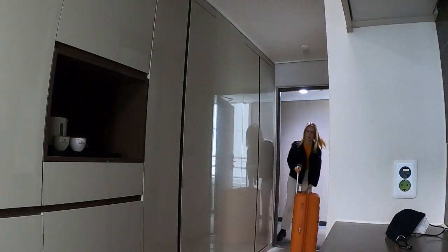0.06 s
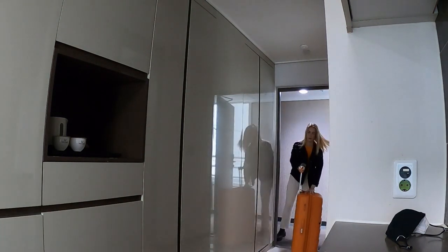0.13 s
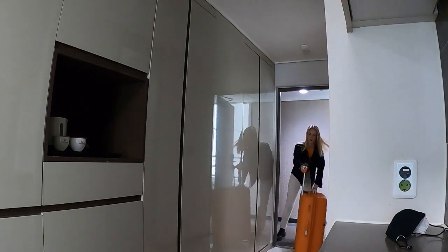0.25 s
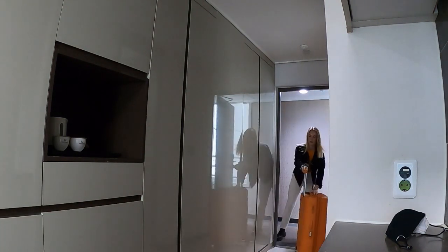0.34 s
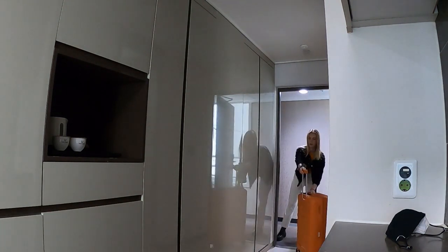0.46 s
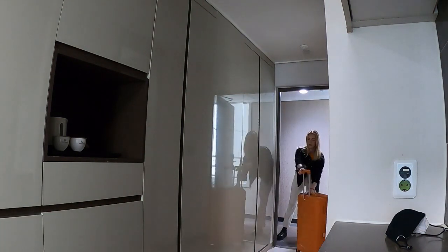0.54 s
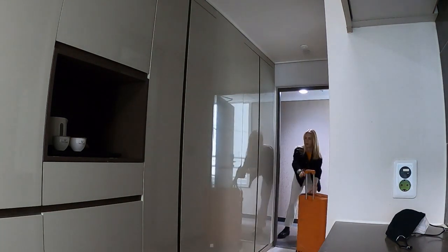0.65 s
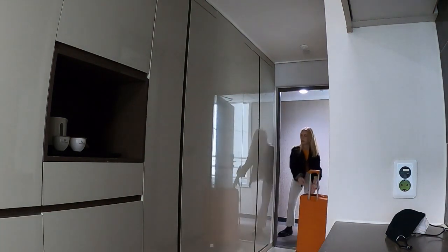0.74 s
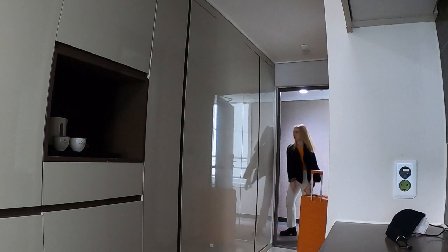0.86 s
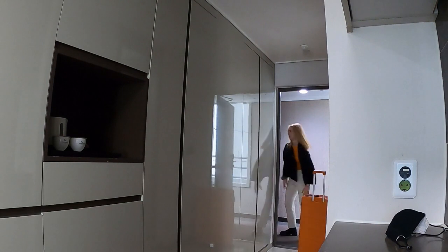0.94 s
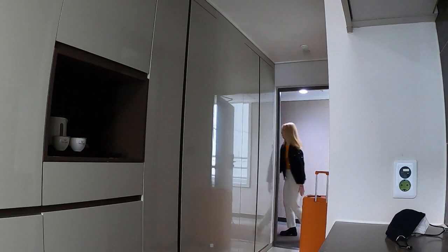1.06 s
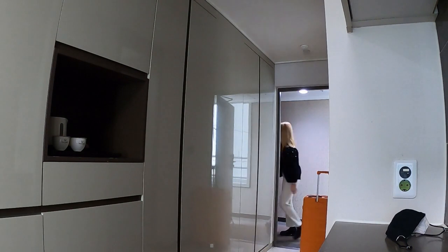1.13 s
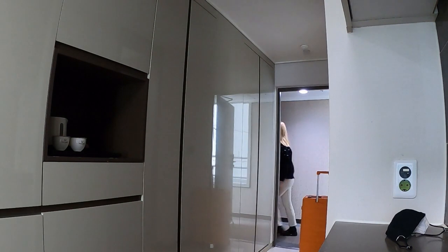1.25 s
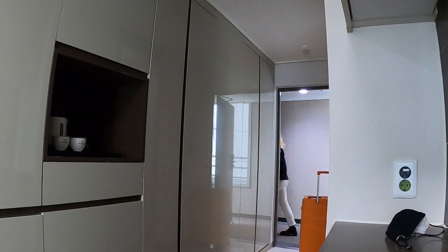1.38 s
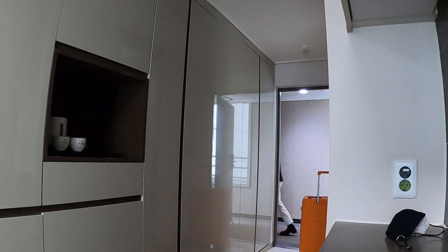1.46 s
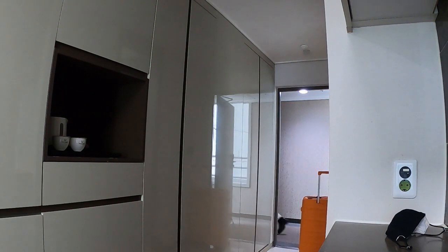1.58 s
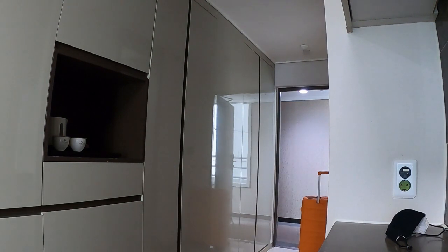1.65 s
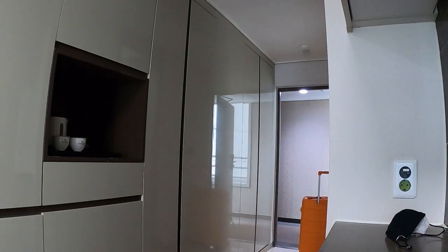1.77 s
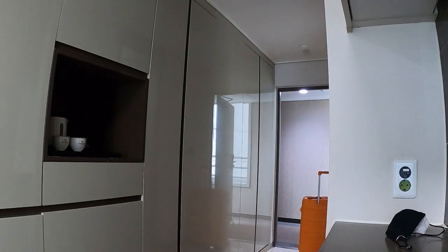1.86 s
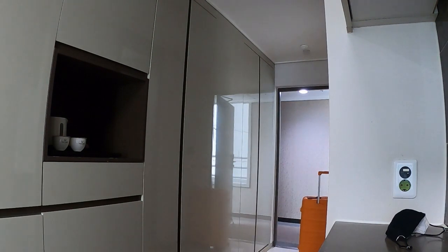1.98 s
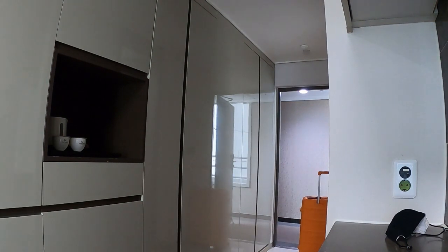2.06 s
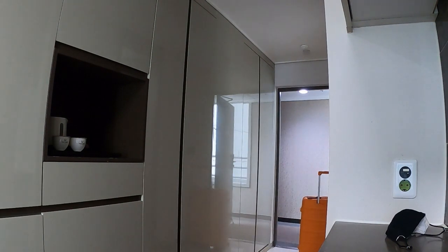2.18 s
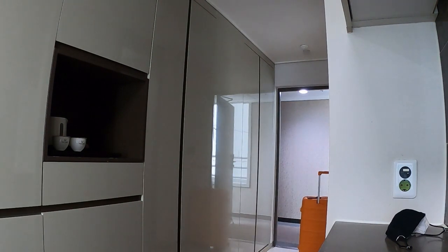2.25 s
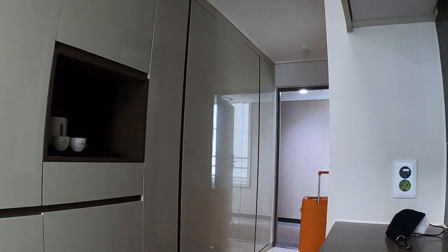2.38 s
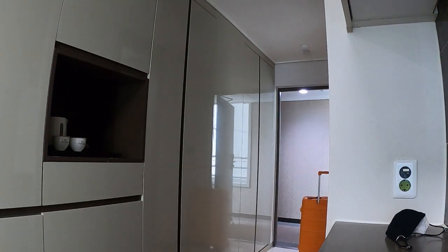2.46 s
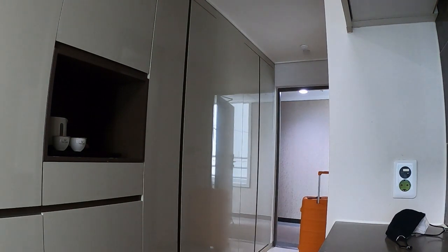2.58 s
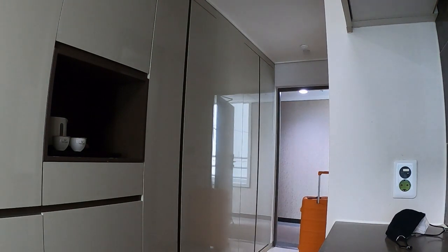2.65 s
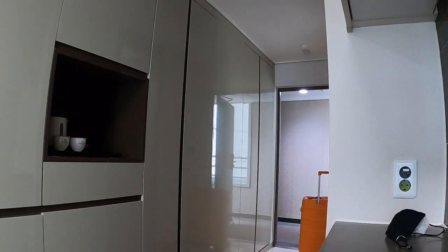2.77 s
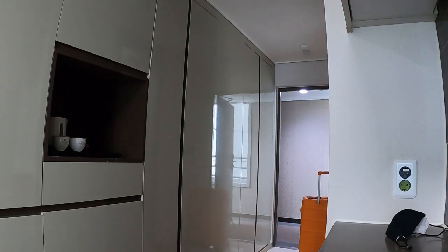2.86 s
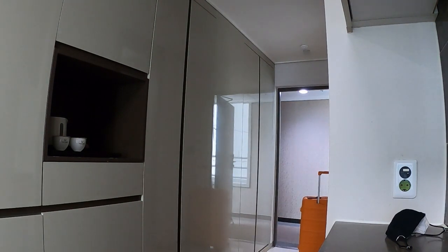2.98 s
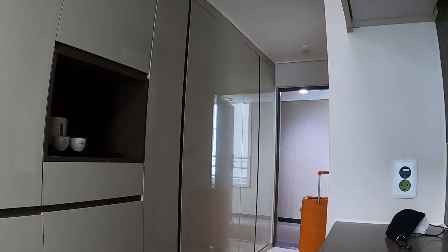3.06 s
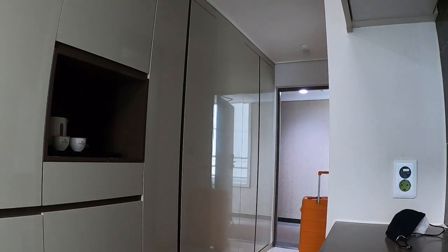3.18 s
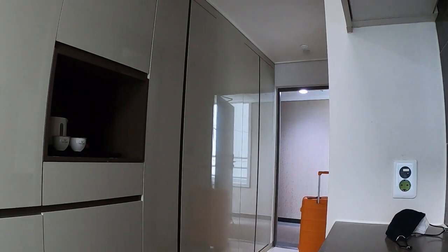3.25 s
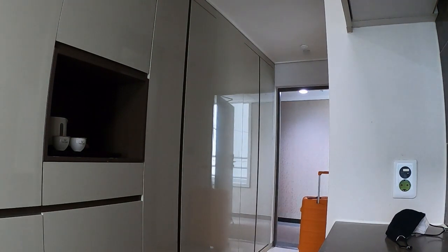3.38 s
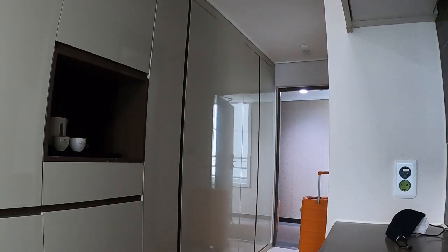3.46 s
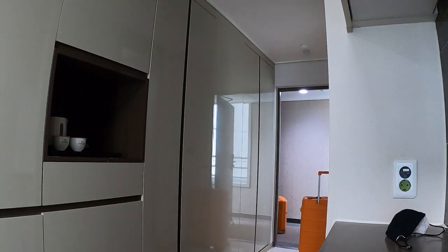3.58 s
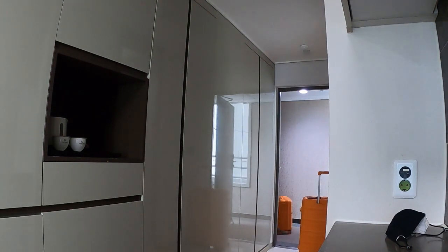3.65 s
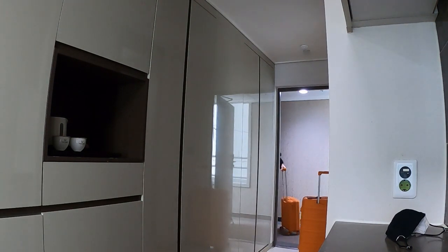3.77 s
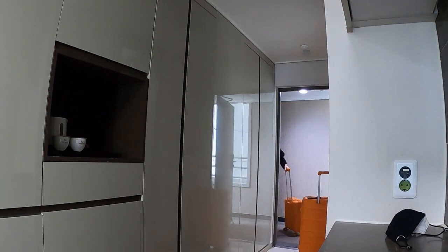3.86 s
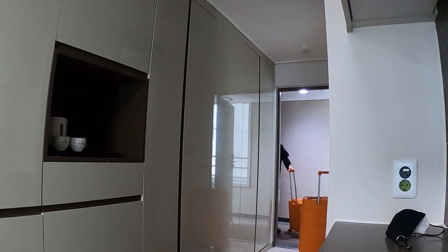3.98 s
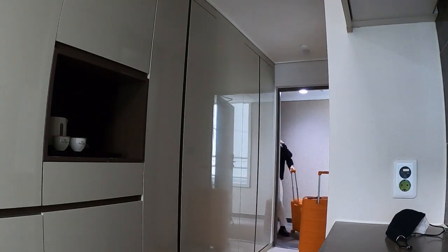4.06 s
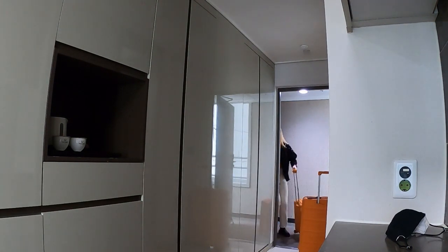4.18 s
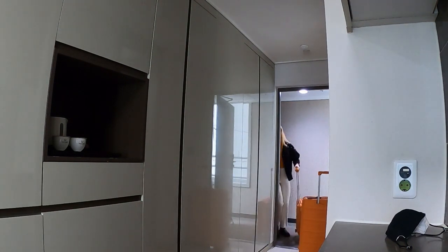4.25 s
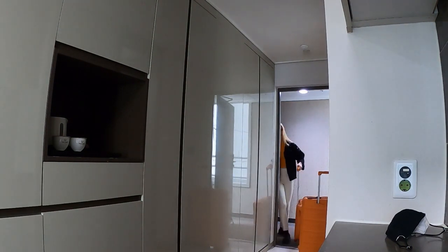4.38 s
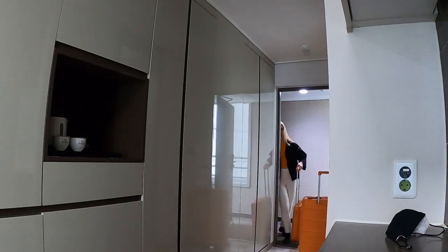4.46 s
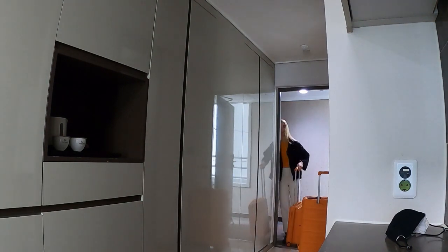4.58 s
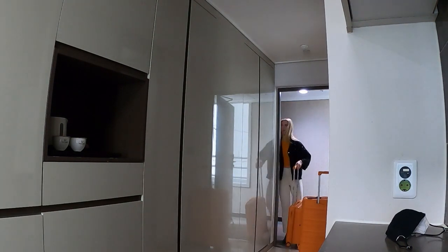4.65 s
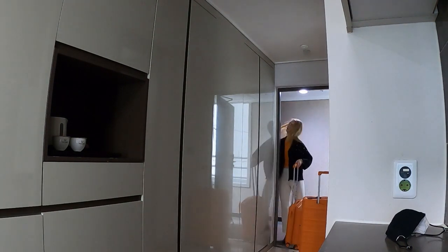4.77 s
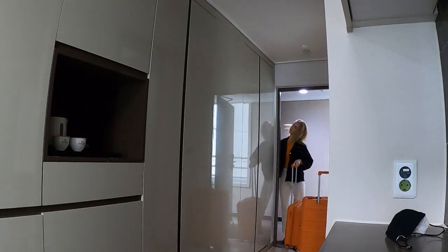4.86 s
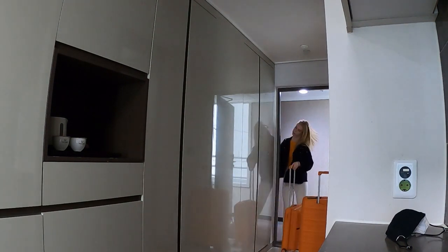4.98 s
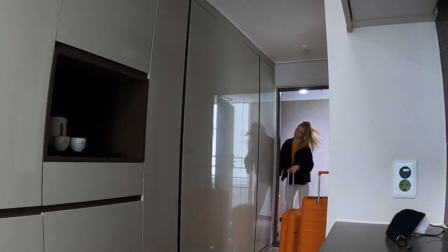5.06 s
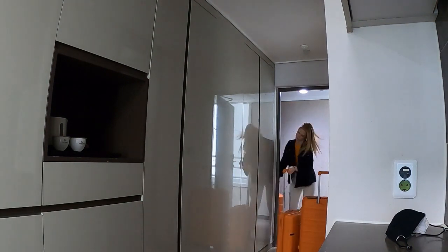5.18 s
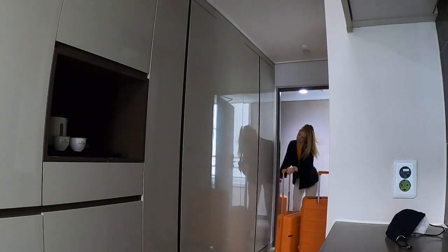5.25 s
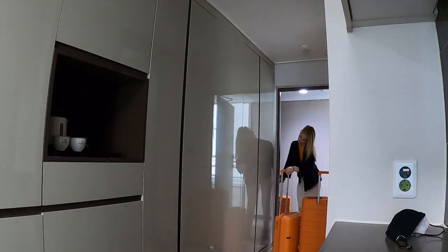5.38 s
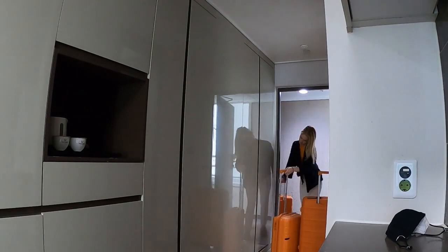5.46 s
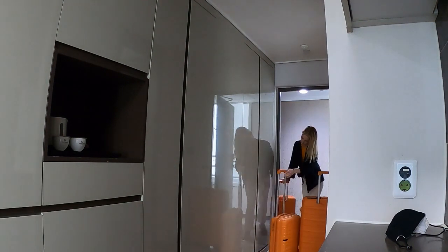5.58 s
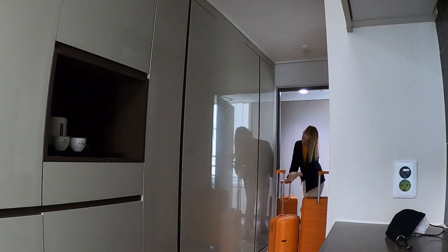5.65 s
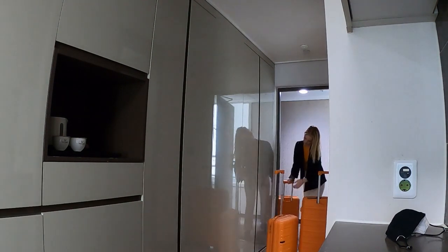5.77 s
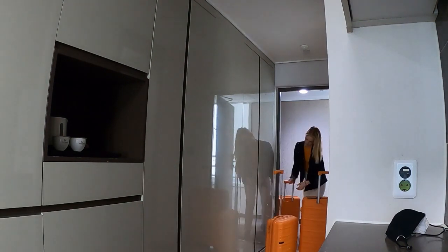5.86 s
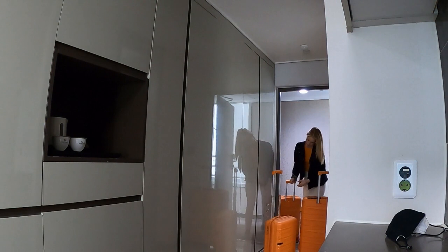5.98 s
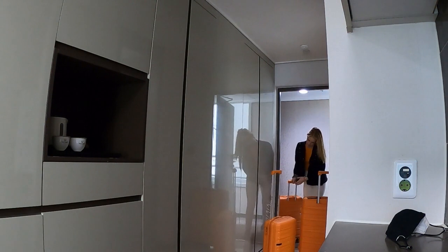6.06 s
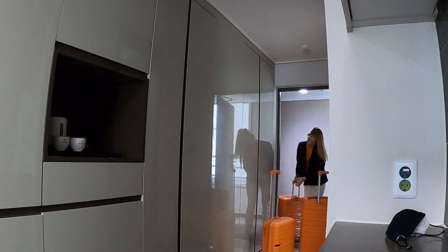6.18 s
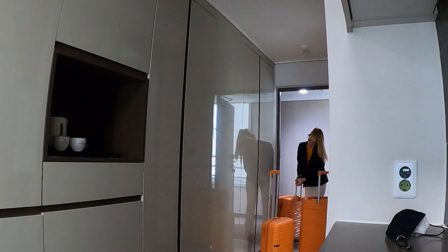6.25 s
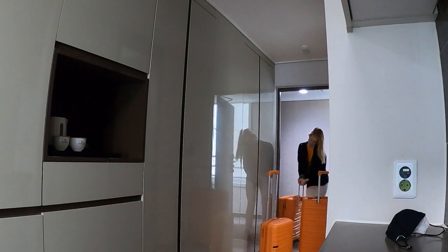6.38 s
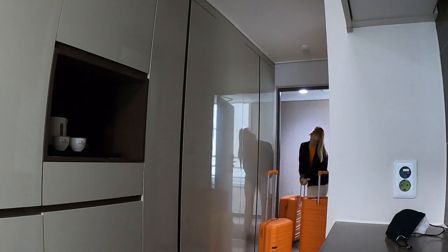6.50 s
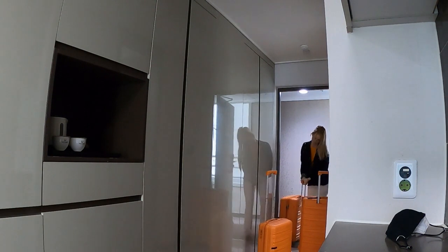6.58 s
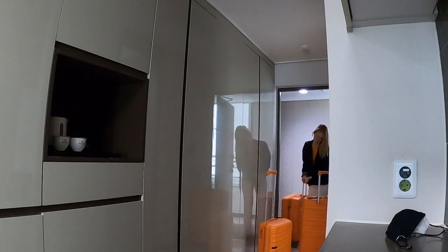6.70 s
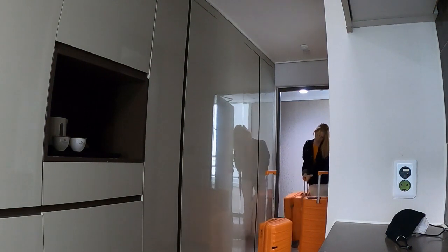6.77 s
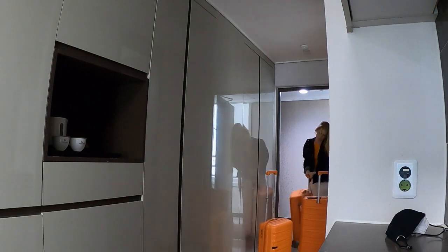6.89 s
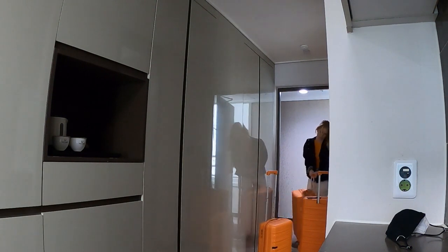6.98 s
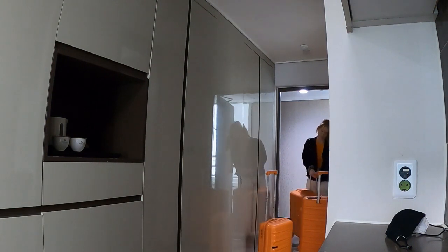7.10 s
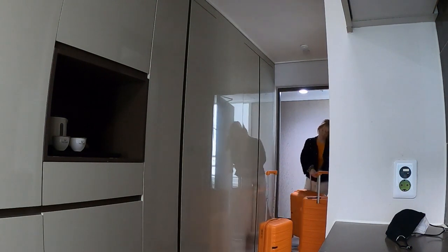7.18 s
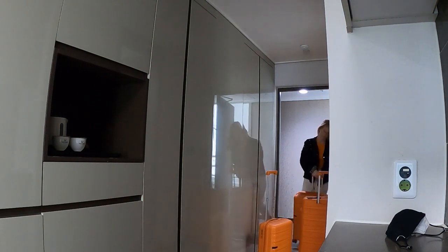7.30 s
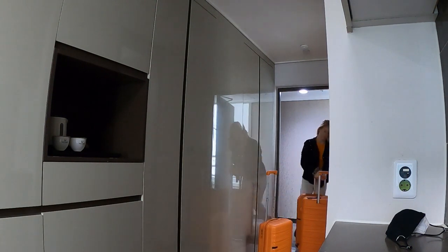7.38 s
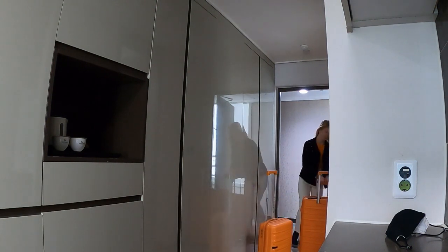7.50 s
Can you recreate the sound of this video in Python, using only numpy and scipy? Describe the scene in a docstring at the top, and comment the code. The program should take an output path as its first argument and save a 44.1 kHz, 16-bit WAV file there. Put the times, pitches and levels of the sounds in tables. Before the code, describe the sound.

In a small echoing hallway, hollow luggage bangs and rattles, falls quiet, then clatters again in two loud bursts and settles with light knocks.

```python
"""Hard-shell suitcases are hauled over a door sill into a small bare hallway, some metres from a two-port microphone.
Struck resonators make the blows: hollow shells boom, floor and panels answer, wheels clack and rattle the handle
tubes, small metal clinks and tinkles. Shaped random grit makes the rumble of wheels and the rub of soles and cloth.
Dense decaying noise makes the hallway ring after every blow; shaped noise makes the low ventilation hum."""
import sys
import numpy as np
from scipy import signal
from scipy.fft import rfft, irfft, next_fast_len
from scipy.io import wavfile

SR = 44100
rng = np.random.default_rng(int(sys.argv[2]) if len(sys.argv) > 2 else 0)


def store_wav(level_fs):
    """Save 16-bit WAV to argv[1]."""
    pcm = np.round(np.clip(np.atleast_2d(level_fs), -1, 1) * 32767)
    wavfile.write(sys.argv[1], SR, pcm.T.astype(np.int16))


N = 332073   # length in samples
SIZE = next_fast_len(N + SR)   # transform length, with room for the reverberant tail
HZ = np.maximum(np.arange(SIZE // 2 + 1) * SR / SIZE, 1)
TIME_S = np.arange(N) / SR


def from_db(db):
    """Logarithmic level: decibels to amplitude gain."""
    return 10 ** (np.asarray(db) / 20)


def rms_one(x):
    """Normalisation: scale to unit root-mean-square amplitude."""
    return x / np.sqrt(np.mean(x ** 2) + 1e-20)


def at_hz(points, hz):
    """Spectral interpolation: read a table linearly on a log-frequency axis."""
    table = np.array(points)
    return np.interp(np.log(hz), np.log(np.maximum(table[:, 0], 1)), table[:, 1])


def coloured(x, spectrum):
    """Linear filtering: multiply a steady signal's spectrum by a table, then set its rms to 1."""
    shaped = rfft(x, SIZE) * from_db(at_hz(spectrum, HZ))
    return rms_one(irfft(shaped, SIZE)[:N])


# Ventilation hum spectrum: f/Hz, relative level/dB (per Hz)
HUM_SPECTRUM = [(15, -39.5), (25, -23.5), (49, -5.5), (90, -10), (103, -13.5), (125, -6.5), (150, 0),
                (326, -30), (363, -12), (604, -31.5), (1060, -41.5), (4260, -53.5), (15000, -55.5)]
HUM_LEVEL_DB = -58   # rms of each of mid and side on entering the ports


def ventilation_hum():
    """Stationary broadband noise: two unrelated shaped draws, for mid and side, form a diffuse field."""
    draws = np.array([coloured(rng.standard_normal(N), HUM_SPECTRUM) for _ in range(2)])
    return from_db(HUM_LEVEL_DB) * draws


def grit(per_s, uneven_db):
    """Poisson-like excitation: random small contacts of uneven size and either sign."""
    unevenness = np.minimum(rng.exponential(1, N), 5)
    sizes = from_db(uneven_db * unevenness) * rng.choice([-1, 1], N)
    return sizes * (rng.random(N) < per_s / SR)


STROKES_PER_S, STROKE_DB = 6.4, 1.6   # corner rate of the chance strokes, and their rms spread


def strokes():
    """Slow random modulation: rubbing comes in uneven strokes, drawn as low-passed noise in dB."""
    r = np.exp(-2 * np.pi * STROKES_PER_S / SR)
    slow = signal.lfilter([1], [1, -2 * r, r * r], rng.standard_normal(N + SR))
    return STROKE_DB * rms_one(slow[SR:])   # the first second only settles the filter


TAIL_RISE_S, TAIL_T60_S = 0.01, 0.45


def noisy_tail(events, level_db):
    """Energy build-up and decay: power envelope of a noisy tail that swells after each blow, then dies away."""
    s, blow_db = np.transpose(events)[:2]
    kicks = np.full(N, 1e-18)
    np.add.at(kicks, (s * SR).astype(int), from_db(2 * (blow_db + level_db)))
    fade = from_db(-120 / (TAIL_T60_S * SR))   # 60 dB of power in one t60
    rise = np.exp(-1 / (TAIL_RISE_S * SR))
    return signal.lfilter([1 - rise], np.convolve([1, -fade], [1, -rise]), kicks)


# Rolling wheels: f/Hz, relative level/dB (per Hz)
RUMBLE_SPECTRUM = [(60, -11), (140, 9.5), (400, -2.5), (750, -17), (1150, -5.5), (2000, -20.5), (4000, -54)]
# Rubbing soles and cloth: f/Hz, relative level/dB (per Hz)
RUB_SPECTRUM = [(800, 4), (1500, 2.5), (3000, 0), (5000, -7), (7300, -10.5), (8800, -14.5), (12000, -28),
                (15500, -45)]
# Course of the motion, before noisy tails and strokes: t/s, rumble level/dB, rub level/dB
MOTION_LEVELS = [(0.0, -26.5, -54.5), (0.58, -69, -50.5), (1.03, -66, -68.5), (1.3, -51, -66),
                 (1.45, -54.5, -57), (1.72, -63, -69.5), (2.01, -58, -84), (2.3, -58.5, -59.5),
                 (2.73, -53.5, -60), (3.36, -52, -68), (3.7, -54.5, -65.5), (4.051, -52.5, -65),
                 (4.59, -57, -73.5), (5.58, -49.5, -62.5), (5.75, -58.5, -58), (5.93, -61.5, -66),
                 (6.12, -52, -71), (6.44, -62.5, -67), (6.73, -53, -53.5), (6.9, -55.5, -63.5),
                 (7.23, -54.5, -61), (7.53, -57, -68.5)]


def rolling_and_rubbing():
    """Friction and rolling noise: filtered grit under power envelopes; unrelated draws for mid and side."""
    s, rumble_db, rub_db = np.transpose(MOTION_LEVELS)
    rumble = np.array([coloured(grit(1500, uneven_db=-0.5), RUMBLE_SPECTRUM) for _ in range(2)])
    rub = np.array([coloured(grit(3000, uneven_db=-4.5), RUB_SPECTRUM) for _ in range(2)])
    # tail levels stand against the boom and against the clack
    rolling_power = from_db(2 * np.interp(TIME_S, s, rumble_db)) + noisy_tail(THUMP_EVENTS, level_db=-21)
    rub_course_db = np.interp(TIME_S, s, rub_db) + strokes()
    rubbing_power = from_db(2 * rub_course_db) + noisy_tail(CLACK_EVENTS, level_db=-34)
    return np.sqrt(rolling_power) * rumble + np.sqrt(rubbing_power) * rub


EARLY_DB, EARLY_S = 2.5, 0.075   # near walls answer first: this much stronger, fading over this time
# Hallway reverberation: f/Hz, t60/s
HALL_T60 = [(60, 0.27), (160, 0.54), (420, 0.65), (1100, 0.54), (2900, 0.44), (7700, 0.46), (14000, 0.27)]


def echoes(build_s, count):
    """Statistical reverberation: noise tails build up, then decay at each half octave's rate; total energy 1."""
    t = np.arange(SR * 3 // 4) / SR
    edges = 25 * 2 ** np.arange(0, 9.6, .5)
    early = from_db(EARLY_DB * np.exp(-t / EARLY_S))
    build = 1 - np.exp(-t / build_s)
    white = rng.standard_normal((2, count, len(t)))
    tail = 0
    for k, (low, high) in enumerate(zip(edges, edges[1:])):
        bandpass = signal.butter(2, [low, high], "band", fs=SR, output="sos")
        band = signal.sosfilt(bandpass, white[k % 2])   # neighbouring bands use unrelated noise
        decay = from_db(-60 * t / at_hz(HALL_T60, np.sqrt(low * high)))
        band = band * decay * build * early
        # energy in proportion to bandwidth
        tail = tail + band * np.sqrt((high - low) / np.sum(band ** 2, axis=1, keepdims=True))
    return rfft(tail / np.sqrt(np.sum(tail ** 2, axis=1, keepdims=True)), SIZE)


SPOT_S = .3   # the cases move to a new spot of the hallway in about this time
# Hallway gain applied to the common (mid) reflections: f/Hz, level/dB
WET_GAIN = [(50, 5), (200, -8.5), (400, 1), (700, 4.5), (3000, 5.5), (12000, 1.5)]


def hallway(radiated):
    """Convolution with room responses: the sound glides through four spots, each with its own reflections."""
    place = (TIME_S / SPOT_S - np.arange(4)[:, None]) % 4
    share = np.clip(1 - np.abs(place - 1), 0, 1)   # power shares of the spots sum to 1
    spots = rfft(radiated * np.sqrt(share), SIZE)
    mid = from_db(at_hz(WET_GAIN, HZ)) * np.sum(spots * echoes(build_s=0.0016, count=4), axis=0)
    side = from_db(6) * np.sum(spots * echoes(build_s=.004, count=4), axis=0)
    return mid, side


# Gain of the diffuse side part: f/Hz, level/dB
SIDE_GAIN = [(30, -13), (70, -19), (130, -32), (300, -25), (600, -16), (1200, -12), (2500, -11), (5000, -5),
             (12000, -3)]
# Port colour, left minus right: f/Hz, level/dB
LEFT_COLOUR = [(60, -0.4), (700, -0.5), (2400, 1), (4400, 0.5), (6500, -0.5), (9000, -4.5), (15000, -2)]
# Phase by which the left port leads: f/Hz, phase/rad
LEFT_PHASE = [(0, 0), (3100, -.95), (4820, -0.74), (6550, -1.63), (7580, -1.7), (9300, -1.3), (10400, -1.7),
              (15200, 0.2)]


def ports(mid, side):
    """Two-point reception: at close ports the left differs in phase and colour, mostly hearing a little late."""
    side = side * from_db(at_hz(SIDE_GAIN, HZ))
    lean = from_db(at_hz(LEFT_COLOUR, HZ) / 2)
    lead = np.exp(1j * np.interp(HZ, *np.transpose(LEFT_PHASE)))
    left = (mid + side) * lean * lead
    right = (mid - side) / lean
    return irfft(np.array([left, right]), SIZE)[:, :N]


FIRST_TOUCH = 0.96   # added to the random size of a chatter's first contact, before energy is set to 1


def blows(times, level_db, modes, chatter_s, spread_db, count, centre_hz=None, focus_db=0):
    """Modal synthesis: uneven contacts excite damped resonators; modes far from the centre pitch are struck less.

    Row 0 is the chatter heard directly; row 1, one contact of equal energy, sets the hallway ringing."""
    at = (np.asarray(times) * SR).astype(int)
    strengths = rng.standard_normal((len(at), len(modes)))
    is_first = np.arange(count) == 0
    late = rng.gamma(1.2, 1, (len(at), count)) * ~is_first
    contacts = rng.laplace(0, 1, (len(at), count))
    contacts = contacts + FIRST_TOUCH * np.sign(contacts) * is_first
    contacts = contacts / np.sqrt(np.sum(contacts ** 2, axis=1, keepdims=True))
    delay = (late * np.reshape(chatter_s, (-1, 1)) * SR).astype(int)
    where = np.clip(at[:, None] + delay, 0, N - 1)
    out = np.zeros((2, N))
    for k, (hz, mode_db, t60) in enumerate(modes):
        octaves_off = 0 if centre_hz is None else np.abs(np.log2(hz / centre_hz))
        size = from_db(level_db + mode_db + spread_db * strengths[:, k] - focus_db * octaves_off)
        clicks = np.full((2, N), 1e-18)
        np.add.at(clicks[0], where, size[:, None] * contacts)
        np.add.at(clicks[1], where[:, 0], size)
        r = from_db(-60 / (t60 * SR))   # pole radius
        w = 2 * np.pi * hz / SR
        sign = (-1) ** k   # neighbouring modes start in opposite phase
        out += signal.lfilter([0, sign * np.sin(w)], [1, -2 * r * np.cos(w), r * r], clicks)
    return out


# Metal zip pulls swinging against the shell: t/s, level/dB, centre f/Hz
ZIP_EVENTS = [(3.617, -47.5, 8800), (5.3444, -39, 7860), (5.3894, -57, 8100), (6.206, -51, 8700),
              (6.761, -57, 8700), (6.884, -55, 8200), (7.2355, -53, 7900), (7.3427, -52, 7200),
              (7.4, -56, 7340)]
# Zip pull modes: f/Hz, level/dB, t60/s
ZIP_MODES = [(7060, -5, 0.049), (7700, 3.5, 0.079), (8630, 8, .008)]


def zip_pulls():
    """Selective modal excitation: small metal tabs tinkle, chiefly in the mode nearest each centre pitch."""
    s, level_db, tab_hz = np.transpose(ZIP_EVENTS)
    tinkle = blows(s, level_db, ZIP_MODES, chatter_s=0.0062, spread_db=3.5, count=3,
                   centre_hz=tab_hz, focus_db=89)
    return tinkle * [[1], [.3]]   # direct, to the hallway


# Clinks of a small metal fitting close by: t/s, level/dB
CLINK_EVENTS = [(1.3694, -37.5), (1.4347, -33.5), (1.484, -43)]
# Fitting modes: f/Hz, level/dB, t60/s
FITTING_MODES = [(2970, -4.5, .03), (4070, -3, 0.032), (5650, -6, .015), (8550, -17, .012)]


def fitting_clinks():
    """Free vibration after impact: a small fitting rings briefly; being near, it feeds the hallway little."""
    s, level_db = np.transpose(CLINK_EVENTS)
    clink = blows(s, level_db, FITTING_MODES, chatter_s=0.001971, spread_db=0.5, count=2)
    return clink * [[1], [.3]]   # direct, to the hallway


# Snap of a sprung catch in the corridor: t/s, level/dB
SNAP_EVENTS = [(2.829, -32.5)]
# Catch plate modes: f/Hz, level/dB, t60/s
PLATE_MODES = [(3020, -0.5, 0.4), (3220, -5.5, .2)]


def catch_snap():
    """Light damping: a sprung catch snaps and its plate rings on."""
    s, level_db = np.transpose(SNAP_EVENTS)
    snap = blows(s, level_db, PLATE_MODES, chatter_s=.004, spread_db=1.0, count=2)
    return snap * [[1], [.5]]   # direct, to the hallway


# Shell panel modes: f/Hz, level/dB, t60/s
PANEL_MODES = [(497, 4, 0.011), (678, -2, 0.027), (800, -1, .015), (1013, 2, 0.013), (1187, -0.5, 0.019),
               (1310, 2, 0.012), (1610, -3.5, 0.0044)]


def panel_knock(times, level_db, chatter_s, spread_db, count):
    """Heavily damped plate modes: chattering contacts make a short dull knock."""
    return blows(times, level_db, PANEL_MODES, chatter_s, spread_db, count)


RATTLE_S = .006   # every hard contact rattles about this long
# Hard wheel and handle contacts, tick and knock relative to the clack:
# t/s, clack level/dB, clack centre f/Hz, fine tick level/dB, dull knock level/dB
CLACK_EVENTS = [(0.004, -20.5, 2740, -15, 13.5), (0.15, -26, 3480, -35, 11), (0.27, -17, 3490, -22.5, -10),
                (0.29, -20.5, 2820, -28, 4), (0.412, -27, 3120, -37, -2), (0.442, -35.5, 3140, -17, 16.5),
                (0.533, -25, 3300, -34, 6.5), (0.565, -27, 3440, -43, 8.5), (0.752, -38, 3040, -21, 8),
                (0.771, -35, 2880, -37, -18), (0.799, -29.5, 3300, -41, 5.5), (0.84, -25, 2090, -16.5, 2.5),
                (0.887, -38.5, 2100, 0.5, -12), (1.213, -32.5, 1780, -16, 2), (1.368, -37, 2900, -3, 1),
                (1.433, -40, 4300, -17, -20), (1.487, -52, 2240, -11, 15), (1.96, -61, 3420, -1.5, 13),
                (2.072, -47.5, 1940, -7.5, 1), (2.157, -55.5, 4200, 0.5, -16),
                (2.195, -41.5, 3440, -5.5, 2), (2.335, -52, 4200, -3, -5), (2.378, -50, 1870, -0.5, 17),
                (2.435, -40, 1900, -25, 2.5), (2.69, -54.5, 2400, -30, 19), (2.714, -42, 1920, -38, 8.5),
                (2.783, -26.5, 3220, -18, 3.5), (2.828, -13, 3360, -10, -13), (3.155, -43.5, 3300, -27, 11),
                (3.18, -29.5, 3170, -30, 7), (3.208, -49.5, 3220, -34, 7), (3.549, -29, 2824, -37, 8),
                (3.619, -51.5, 3150, -22, 8), (3.76, -51.5, 3020, -14, 16.5), (3.945, -39, 1830, -20.5, 8),
                (3.964, -30, 3050, -22, 2.5), (4.185, -37, 1950, -7.5, 2.5), (4.522, -50.5, 2110, -5, -26),
                (4.699, -15.5, 3450, -19.5, 1.5), (4.722, -22.5, 3480, -9.5, 7),
                (4.771, -15.5, 2560, -18.5, 7.5), (5.186, -22.5, 2580, -19, 7.5),
                (5.194, -24, 2580, -23, 0), (5.201, -8.5, 2700, -18.5, -24),
                (5.304, -14.5, 3190, -20.5, -7), (5.347, -20.5, 3370, -25, -18),
                (5.549, -40, 3220, -24, -1), (5.771, -54.5, 3480, 2.5, -10), (5.817, -40, 2020, -28, 11),
                (6.206, -52.5, 2100, -2, 15.5), (6.38, -43.5, 2130, -10.5, 8),
                (6.625, -36.5, 2250, -17.5, -22), (6.676, -43.5, 1860, -7, 14),
                (6.738, -34, 3580, -18, 8.5), (6.76, -50, 4060, 0, -14), (6.781, -33, 4200, -15, 4),
                (6.804, -57, 4300, -15, -10), (6.845, -38.5, 2220, -24, 2.5), (6.977, -48, 2000, -31, 16),
                (7.181, -48, 2200, -34, -6), (7.235, -50, 2240, -16, 7), (7.285, -45, 1940, -33, -13)]
# Handle tube modes: f/Hz, level/dB, t60/s
HANDLE_MODES = [(1920, 8.5, 0.0024), (2480, -0.5, 0.0067), (2734, -1, 0.0094), (2990, 3.5, 0.0061),
                (3295, 0.5, 0.0079), (3530, -0.5, 0.0092), (3990, -1.5, 0.0026)]
# Fine tick modes: f/Hz, level/dB, t60/s
TICK_MODES = [(4650, 3.5, 0.0014), (5614, 5, 0.0025), (6220, 2, 0.0021), (7430, -5, 0.0027),
              (8800, -5.5, 0.0023), (10300, -20.5, 0.0018), (13000, -31, .002)]


def clacks():
    """Repeated impact: a hard contact rattles the handle tubes, with a fine tick above and a dull knock below."""
    s, clack_db, clack_hz, tick_db, knock_db = np.transpose(CLACK_EVENTS)
    tubes = blows(s, clack_db - 0.5, HANDLE_MODES, chatter_s=RATTLE_S, spread_db=1.5, count=12,
                  centre_hz=clack_hz, focus_db=10.0)
    tick = blows(s, clack_db + tick_db + 5.5, TICK_MODES, chatter_s=RATTLE_S, spread_db=3.0, count=12)
    knock = panel_knock(s, clack_db + knock_db - 11, chatter_s=RATTLE_S, spread_db=0.5, count=24)
    return tubes + tick + knock


BOOM_LAG_S = 0.004024   # the shell boom starts just after the floor thud
# Shells and heels landing, thud and knock relative to the boom:
# t/s, boom level/dB, boom centre f/Hz, floor thud level/dB, panel knock level/dB
THUMP_EVENTS = [(0.004, -28.5, 221, 10, -4), (0.163, -12.5, 487, -13.5, -1), (0.202, -27, 401, -27, -6),
                (0.269, -13.5, 306, -42, -9), (0.292, -6, 267, -20, -1), (0.307, -11, 254, -14, -27),
                (0.412, -17.5, 288, -24.5, -6), (0.456, -12.5, 178, -21, -14), (0.57, -25, 188, -7, -14),
                (0.758, -29.5, 194, -4, -5), (0.841, -24, 480, -20.5, 9.5), (0.877, -26.5, 181, 1, -18),
                (1.222, -36.5, 164, -33, 3.5), (2.778, -40.5, 166, 6, -8), (2.839, -27, 300, -16.5, 5),
                (3.146, -33.5, 172, -5.5, -10), (3.199, -36.5, 207, 3.5, 3.5),
                (3.555, -28, 493, -3.5, -0.5), (3.659, -36.5, 188, -16, -22), (3.954, -29.5, 356, -5, -5),
                (4.202, -34, 310, 8, 0), (4.29, -41, 185, 2, -31), (4.701, -14.5, 337, -24, 1),
                (4.721, -7.5, 344, -4, 1), (4.745, -17.5, 300, -1, -3), (4.771, -15, 450, -32, -9),
                (4.783, -10.5, 308, -9, 0.5), (5.199, -12, 202, -20.5, -0.5), (5.229, -21, 200, -1.5, 8),
                (5.304, -24.5, 192, -5, 13.5), (5.328, -22, 187, -54, -3), (5.558, -40.5, 231, -24, 7.5),
                (5.848, -35, 292, 1, -6.5), (6.038, -37.5, 168, -5, -6.5), (6.211, -41, 172, -4, -26),
                (6.382, -41, 333, -5, -15), (6.626, -44.5, 172, 7, 3.5), (6.676, -23.5, 168, 5, -7),
                (6.777, -47, 172, 14, -15), (7.042, -40.5, 175, 2.5, 0.5), (7.182, -32, 190, -6, -28),
                (7.24, -59, 190, -10, -25)]
# Floor and hallway air modes: f/Hz, level/dB, t60/s
FLOOR_MODES = [(43.2, -34, 0.04), (98.3, -4, 0.093), (112.2, -4.5, 0.34), (146.5, 6, 0.075)]
# Hollow shell modes: f/Hz, level/dB, t60/s
SHELL_MODES = [(192.4, 0, 0.27), (235, -0.5, 0.068), (292.4, -0.5, 0.11), (349.2, -7, 0.16),
               (394.9, -9.5, 0.26), (485, -3, 0.11)]


def thumps():
    """Parallel resonators: a landing makes a floor thud, a hollow shell boom and a panel knock."""
    s, boom_db, boom_hz, thud_db, knock_db = np.transpose(THUMP_EVENTS)
    thud = blows(s, boom_db + thud_db - 6.5, FLOOR_MODES, chatter_s=0, spread_db=0.5, count=1)
    boom = blows(s + BOOM_LAG_S, boom_db - 5.0, SHELL_MODES, chatter_s=0, spread_db=3.5, count=1,
                 centre_hz=boom_hz, focus_db=7.0)
    knock = panel_knock(s, boom_db + knock_db - 7.0, chatter_s=.008, spread_db=0.0, count=20)
    return thud + boom + knock


# The door frame shades the direct sound while a case is out in the corridor: t/s, level/dB
DOOR_SHADE = [(0, 1.5), (1.2, 0), (1.5, -2), (4.1, -3.5), (4.6, 1), (5.0, 1.5), (5.25, -0.5), (7.53, -3.5)]


def scene():
    """Superposition: blows arrive directly and through the hallway; rolling, rubbing and hum arrive diffusely."""
    direct, radiated = thumps() + clacks() + fitting_clinks() + catch_snap() + zip_pulls()
    shaded = direct * from_db(np.interp(TIME_S, *np.transpose(DOOR_SHADE)))
    reflected_mid, reflected_side = hallway(radiated)
    blow_sound = ports(rfft(shaded, SIZE) + reflected_mid, reflected_side)
    steady = ventilation_hum() + rolling_and_rubbing()
    return blow_sound + ports(*rfft(steady, SIZE))


def record(dry):
    """Band limitation: the small ports lose the deepest bass, and the top is cut steeply."""
    bass_cut = signal.butter(2, 35, "high", fs=SR, output="sos")
    top_cut = signal.cheby2(12, 70, 15650, fs=SR, output="sos")   # order, stopband dB, stopband edge Hz
    return signal.sosfilt(top_cut, signal.sosfilt(bass_cut, dry))


dry = scene()
out = record(dry)
store_wav(out)
```